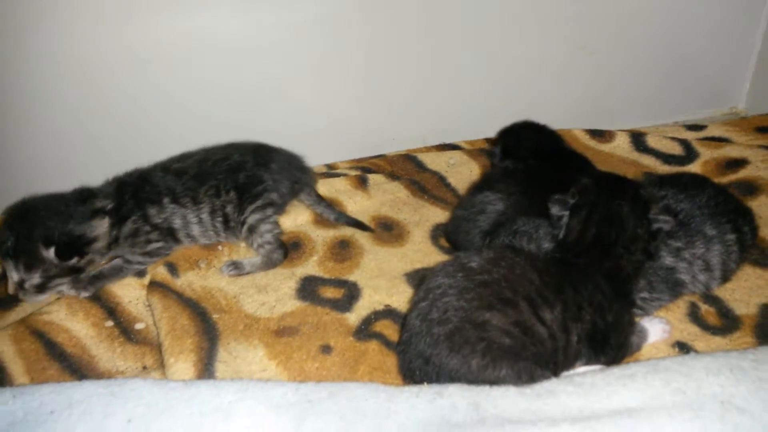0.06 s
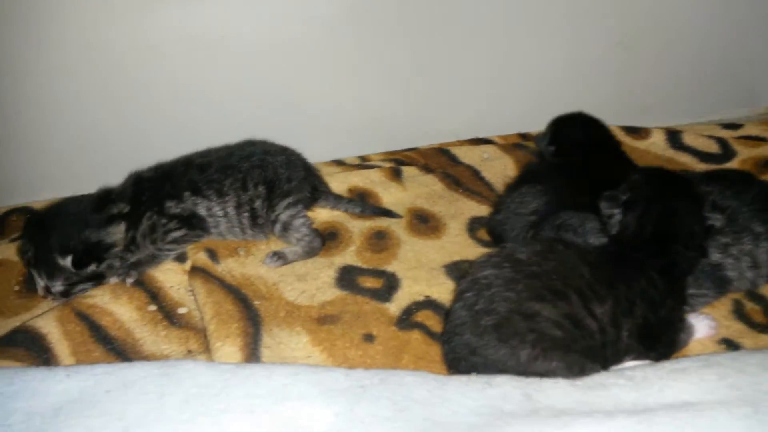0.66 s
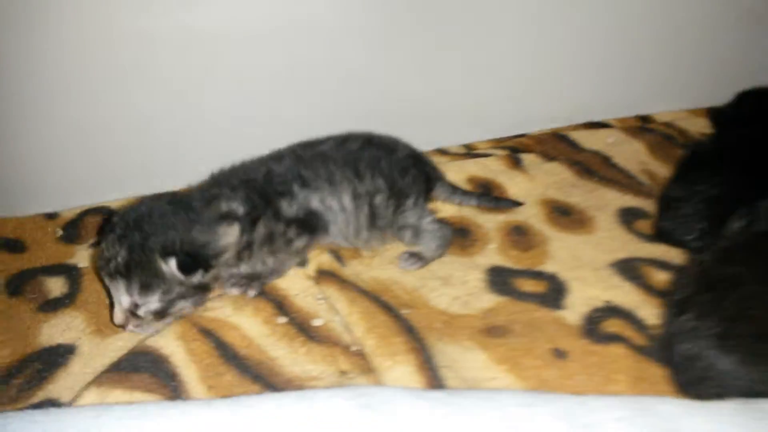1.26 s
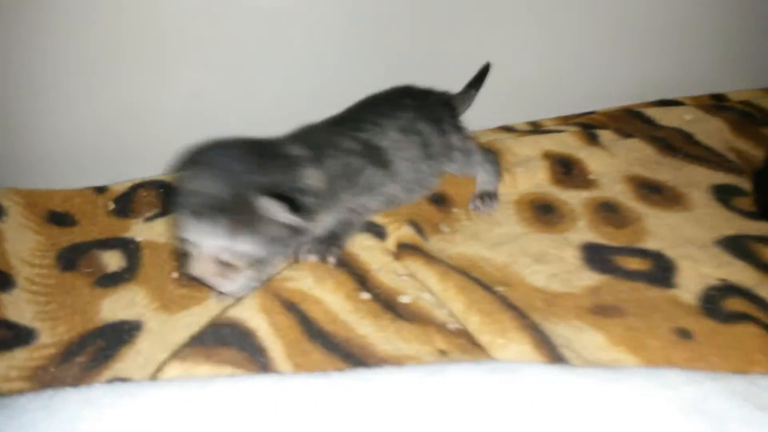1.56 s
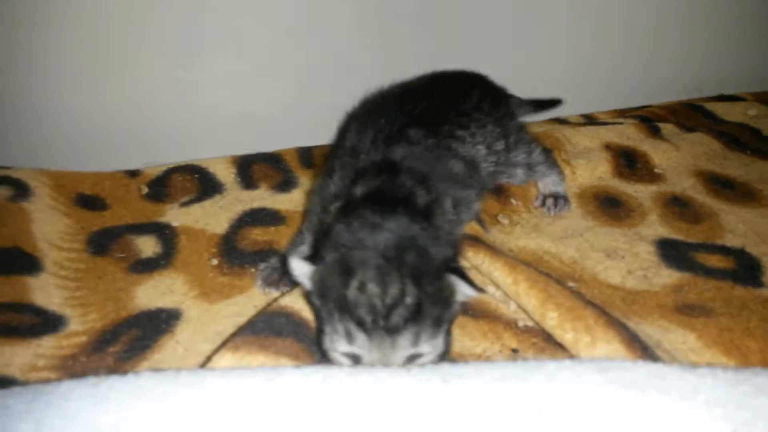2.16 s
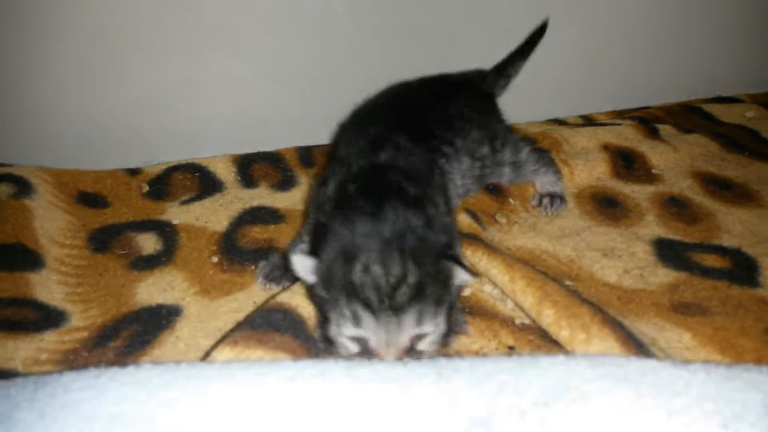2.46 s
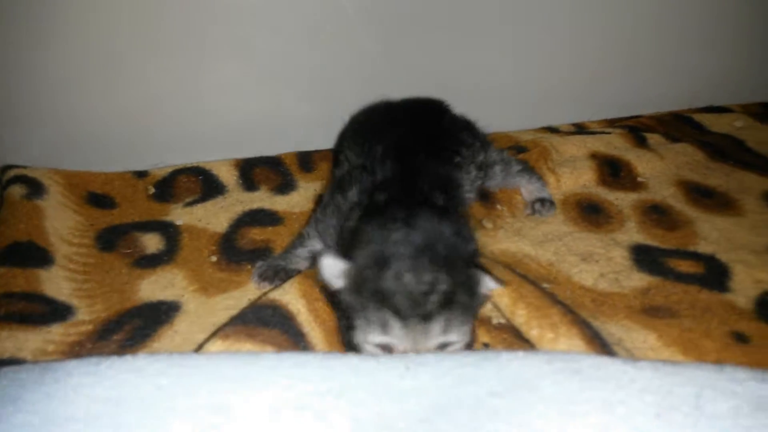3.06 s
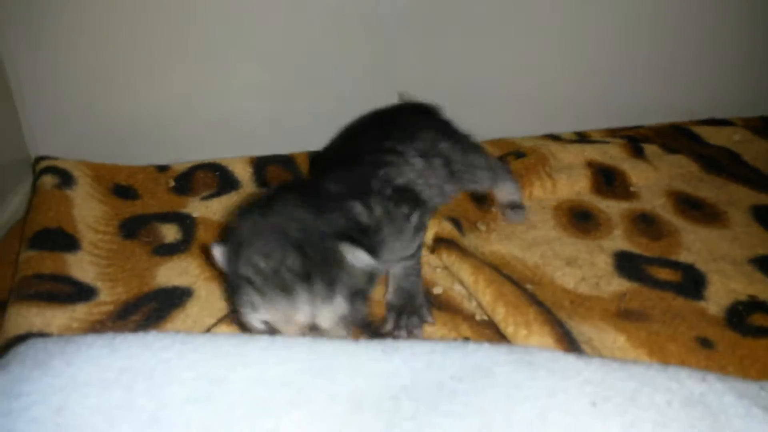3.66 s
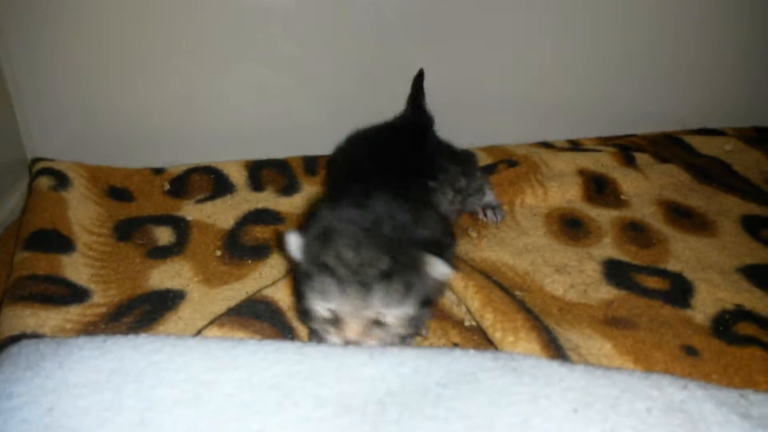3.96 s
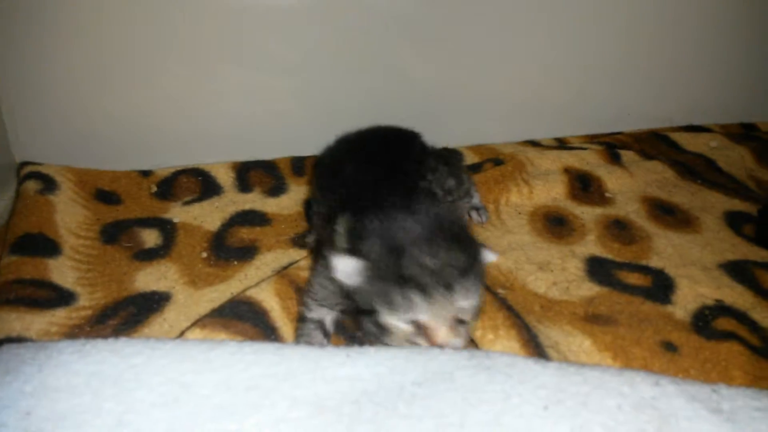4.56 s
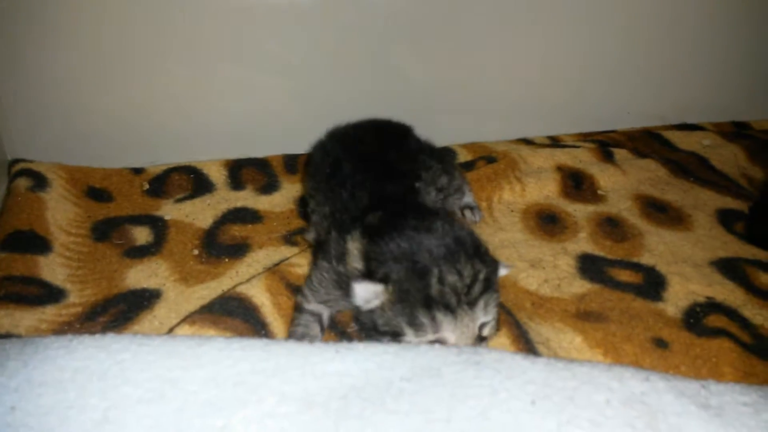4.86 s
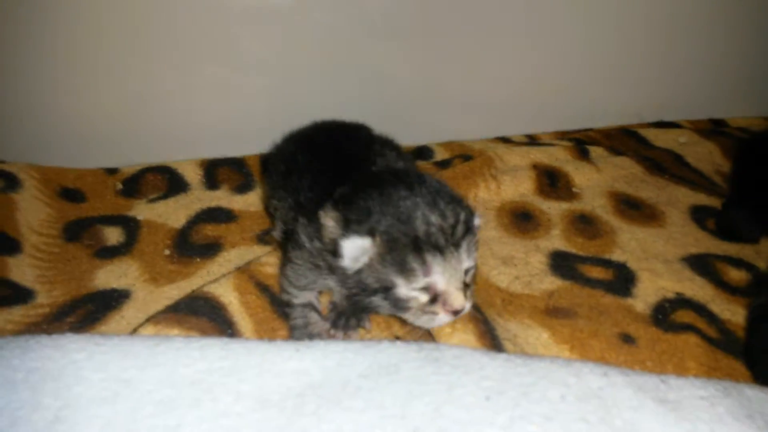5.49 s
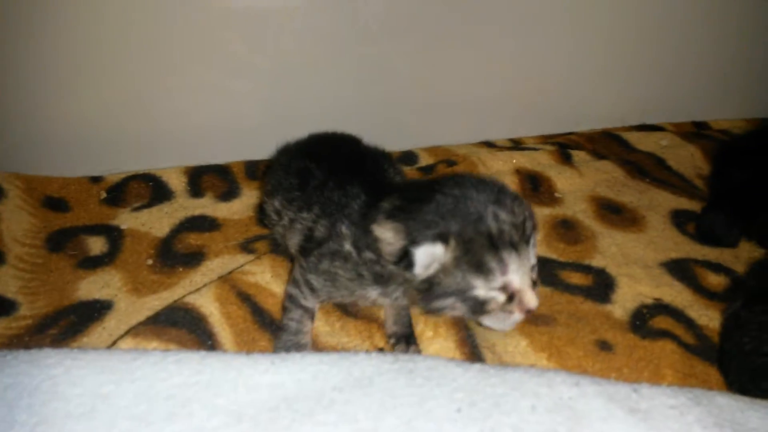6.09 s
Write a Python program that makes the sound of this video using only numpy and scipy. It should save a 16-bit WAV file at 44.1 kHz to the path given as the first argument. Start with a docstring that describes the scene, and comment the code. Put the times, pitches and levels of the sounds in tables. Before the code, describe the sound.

A newborn kitten gives thin, high mews while crawling on a blanket, and halfway through a heavy door bangs shut and latches.

```python
"""Kitten on a blanket

A newborn kitten mews six times in a small room; its vocal folds make each mew a thin arch of pitch. Its breath
rasps as a mew begins; its mouth smacks, its claws tick and its fur brushes the fleece as it crawls. Halfway, a
heavy door rumbles, creaks, bangs and latches, and the room rings after it over a low drone and a faint hiss."""
import sys
import numpy as np
from scipy import signal
from scipy.fft import rfft, irfft, next_fast_len
from scipy.io import wavfile

SR = 44100
rng = np.random.default_rng(int(sys.argv[2]) if len(sys.argv) > 2 else 0)


def wav_record(signal):
    """Record a signal, one row per channel, as 16-bit PCM in the file named by sys.argv[1]."""
    frames = np.transpose(np.atleast_2d(signal))
    bounded = np.clip(frames, -1, 1)
    # unit amplitude maps onto the largest positive 16-bit level
    quanta = np.round(bounded * 32767).astype(np.int16)
    wavfile.write(sys.argv[1], SR, quanta)


N = 279153
TIME = np.arange(N) / SR
CUTOFF_HZ = 14700

# Levels are relative. A "colour" is a noise's strength at each frequency; t60 is the time to fade 60 dB.
# one mew a row: start t/s, catch t/s, top t/s, end t/s, start f/Hz, top f/Hz, end f/Hz, flatness of
# the top, mouth opens t/s, fundamental level/dB, octave level/dB, shrill level/dB, tilt/(dB per octave)
MEWS = [(0.046, 0.196, 0.315, 0.490, 516, 1161, 864, 2.8, 0.23, -47, -56, -49.5, -0.5),
        (1.450, 1.636, 1.695, 1.997, 702, 1420, 838, 1.6, 1.54, -42.5, -44, -40.5, -3),
        (2.510, 2.649, 2.787, 2.893, 464, 1126, 801, 4.7, 2.695, -46, -41, -48.5, 2.5),
        (3.979, 4.105, 4.163, 4.245, 513, 790, 446, 2.6, 4.03, -54.5, -52, -53.5, -1),
        (4.723, 4.854, 4.930, 5.130, 609, 1383, 773, 2.9, 4.770, -46.5, -41, -43.5, -3.5),
        (5.922, 6.062, 6.184, 6.263, 452, 1056, 812, 4.6, 6.17, -50.5, -46, -50, -0.5)]
# wall and bed reflect each mew unevenly: left lead/rad, left minus right/dB (fundamental, then octave)
REFLECTIONS = [(-2.5,1.5,4.5,-8.5),(0.73,0,-1.84,-4),(1,1.5,-2.5,-8),(-0.6,-4,-2,-2.5),(0.6,-6.5,-1.5,1),(0.43,4.5,1.4,-4)]
# the voice breaks and rasps for a moment: t/s, half length/s, depth (0-1)
VOICE_BREAKS = [(0.123,0.021,0.5),(0.26,0.018,0.56),(0.485,0.063,0.48),(1.642,0.017,0.4),(1.798,0.016,0.27),(1.993,0.041,0.53),(2.694,0.0095,0.15),(2.918,0.04,0.7),(4.237,0.044,0.55),(5.007,0.017,0.24),(5.107,0.018,0.38),(6.269,0.0083,0.34)]
# the nearby wall lifts and sinks the two lowest harmonics as they glide: f/Hz, level/dB
WALL_GAIN = [(600,-6),(810,4),(950,-5),(1070,-1),(1170,3.5),(1310,-4),(1420,-0.5),(1650,-1),(1790,-2),(1950,-2),(2080,0),(2270,-3),(2500,-1.5),(2750,1.5)]
# the throat swallows the third harmonic as pitch climbs: pitch f/Hz, level/dB against the octave
THIRD_HARMONIC = [(550,-7.5),(800,-14),(1050,-19),(1250,-19.5),(1400,-41)]
# the tiny mouth shapes the shrill harmonics, from the fourth up: f/Hz, level/dB
MOUTH_GAIN = [(2200,-11),(3200,-3.5),(4300,-16),(5400,-17.5),(6300,-9.5),(7000,-2),(8200,1.5),(9600,-12),(12000,-19.5),(14500,-20)]
SMACKS = [(.517,-65,0.12),(4.356,-54.5,0.19),(5.303,-54.5,0.096),(5.825,-60.5,0.84)]  # wet smacks of the mouth: t/s, level/dB, t60/s
SMACK_COLOUR = [(450,-13),(800,1.5),(1100,2),(1350,8.5),(1650,7),(2200,-12),(4000,-8),(9000,-11.5)]  # their tone: f/Hz, level/dB

CLAW_TICKS = [(0.3324,-32,0.14),(0.558,-48.5,0.12),(0.579,-41,0.057),(.757,-49,0.044),(1.1105,-41.5,0.11),(1.3057,-48,0.065),(1.406,-44,0.2),(1.429,-42.5,0.12),(1.877,-32,0.026),(1.9037,-30.5,0.1),(2.186,-48,0.09),(3.8803,-37,0.26),(5.203,-43,0.047),(5.303,-45.5,0.042),(5.7284,-41.5,0.021),(5.804,-55,0.032)]  # claws catching the cloth: t/s, level/dB, t60/s
BRIGHT_COLOUR = [(500,-42),(2500,-22),(4800,-17),(6800,-10),(8000,-5.5),(9500,-17),(14500,-29)]  # the tone of claws and breath: f/Hz, level/dB
SNAPS = [(1.9034,-27,6780,0.022),(3.5319,-8.5,7440,0.0026)]  # dry snaps very close by: t/s, level/dB, f/Hz, t60/s
SOFT_RASPS = [(0.061,0.034,-60),(0.122,0.023,-60),(0.32,0.014,-71),(1.204,0.061,-66),(1.462,0.045,-60.5),(2.505,0.06,-58),(3.935,0.027,-57.5),(5.927,0.041,-59)]  # soft rasps of breath as mews begin, and fur brushing the fleece: t/s, half length/s, level/dB
SOFT_RASP_COLOUR = [(400,-4.5),(900,-2.5),(1600,-3.5),(2200,-8.5),(3200,-2.5),(4500,-9.5),(6000,-12),(14000,-24.5)]  # its tone: f/Hz, level/dB

DOOR_BLOWS = [(1.612,-56,-62.5,-90),(2.387,-47.5,-61.5,-78),(2.766,-35.5,-58,-79),(3.269,-15.5,-33.5,-18.5),(3.547,-35.5,-26,-41),(3.655,-43,-58,-32.5)]  # knocks of the door: t/s, boom level/dB, slap level/dB, clatter level/dB
DOOR_MODES = [(68.65,-1.5,0.99),(85.4,8.5,0.36),(123.16,0,1),(145.7,-1,0.57),(199.3,-9.5,0.59),(224.2,-12.5,0.39),(293,-12,0.51),(307,-10,0.44),(465,-12.5,0.56),(640,-12,0.35)]  # the notes that door and room ring with: f/Hz, level/dB, t60/s
THUD_COLOUR = [(25,-16),(48,-23),(100,-2),(170,-10),(215,-7),(370,-10),(700,-27),(3000,-65)]  # the noisy part of the boom: f/Hz, level/dB
SLAP_COLOUR = [(150,-2),(330,-10),(510,1.5),(700,-10.5),(950,-12),(1300,-24.5),(2600,-26),(4100,-18),(6000,-21),(12000,-86)]  # slapping wood: f/Hz, level/dB
CLATTER_COLOUR = [(600,-17.5),(1500,-21),(2800,-17.5),(4300,-16.5),(5700,-11),(7200,-2),(8200,-6.5),(9500,-15),(12000,-20.5),(14500,-37)]  # the rattling metal latch: f/Hz, level/dB
ROOM_DECAY = [(100,0.86),(500,0.62),(2000,0.9),(7000,0.64),(14000,0.48)]  # how long the room rings: f/Hz, t60/s
HANDLE_CLACK = (3.173, -38.5, 0.12)  # the handle, just before the bang: t/s, level/dB, t60/s
CLACK_COLOUR = [(500,-4),(1000,-2.5),(2100,1),(3000,2),(4300,1),(6000,-6),(8000,-3),(14000,-44)]  # its tone: f/Hz, level/dB
LATCH_PINGS = [(3.547,-25,3980,0.024),(3.548,-36,4880,0.031),(3.657,-28,4800,0.041)]  # the struck latch rings: t/s, level/dB, f/Hz, t60/s
HINGE_CREAK = [(3.128,509,-72),(3.134,489,-49.5),(3.17,549,-47),(3.2,626,-50),(3.26,586,-48.5),(3.28,590,-64)]  # the path of the creak: t/s, f/Hz, level/dB

RUMBLES = [(1.61,2.1,-54),(2.365,2.767,-51.5),(2.76,3.27,-46.5),(3.6,4.2,-50.5)]  # the moving door stirs the room's low notes: start t/s, end t/s, level/dB
RUMBLE_COLOUR = [(25,-8.5),(52,-19.5),(62,1.5),(69,3),(80,-4),(105,-19),(123,-3.5),(138,-12),(190,-28),(300,-28),(600,-31),(1200,-41),(3000,-42),(9000,-38)]  # their tone: f/Hz, level/dB
DULL_RUMBLES = [(0.0,0.3,-60),(.32,.42,-59.5),(1.6,2.15,-61.5),(3.9,5.7,-61.5),(5.7,6.33,-60)]  # a dull low rumble comes and goes: start t/s, end t/s, level/dB
DULL_RUMBLE_COLOUR = [(25,-5),(49,0),(81,-7),(118,-1.5),(151,-13),(181,-8.5),(230,-24),(550,-26.5),(1200,-31.5),(3000,-34)]  # its tone: f/Hz, level/dB
DRONE_COLOUR = [(20,-10),(40,-9),(70,-10.5),(130,-13),(220,-27.5),(1000,-71)]  # steady low air of the house: f/Hz, level/dB
HISS_COLOUR = [(200,-17),(400,-11.5),(1500,-16),(5000,-17),(6200,-14.5),(7000,-4.5),(8200,-4.5),(9200,-15.5),(14500,-17)]  # faint hiss: f/Hz, level/dB
WHINE_TONES = [(8000,-79),(14000,-95.5)]  # thin electronic tones: f/Hz, level/dB
STEREO_LIKENESS = [(100,1),(300,0.74),(600,0.26),(1200,0.059),(4000,0),(14000,0.088)]  # how alike left and right are: f/Hz, correlation (1 = the same)
STEREO_BALANCE = [(120,0),(280,-3.5),(600,-0.5),(1200,2),(4000,0.5),(6500,7),(8300,-2),(10000,-2),(14000,1)]  # which side is louder: f/Hz, left minus right/dB


def kitten(voice_db=-1, echo_db=-7, echo_t60=0.16):
    """The mews, smeared by quick reflections from the corner, mostly in the treble."""
    voice, t = np.zeros((2, N)), np.arange(SR // 4) / SR
    for row, reflection in zip(MEWS, REFLECTIONS):
        add(voice, *mew(row, reflection))
    echo = noise([(1200, -9), (2500, -3.5), (6000, 1.5), (14000, -7)], len(t))
    echo *= from_db(-60 * t / echo_t60)
    echo /= np.sqrt(np.sum(echo ** 2) / 2)
    reflected = signal.fftconvolve(voice, echo, axes=1)[:, :N]
    return from_db(voice_db) * (voice + from_db(echo_db) * reflected)


def mew(row, reflection, jitter=0.00442, rasp_jitter=0.048, breath_db=-19.5, fade_s=0.012):
    """Vibrating vocal folds make the tone; when the voice rasps, their cycles turn uneven and weaker."""
    t, pitch, fundamental_db, octave_db, shrill_db, tilt_db = mew_shape(row, fade_s)
    size = len(t)
    croak = 0.5 * np.clip(1.5 - pitch / 650, 0, 1)  # the folds are slack at low pitch
    rasp = croak + sum(depth * bump(t, s, width) for s, width, depth in VOICE_BREAKS)
    wobble = drift(70.12, size) + 0.65 * drift(600, size)
    pitch = pitch * (1 + jitter * wobble + rasp_jitter * rasp * drift(900, size))
    phase = 2 * np.pi * np.cumsum(pitch) / SR
    tone = 0
    for k, db, (lead, side_db) in zip((1, 2), (fundamental_db, octave_db), np.reshape(reflection, (2, 2))):
        gain = from_db(db + 2.56 * drift(80.3, size)) * pan(side_db)
        tone += gain * np.sin(k * phase - lead * np.array([[0], [1]]))
    tone += overtones(pitch, phase, octave_db, shrill_db, tilt_db)
    puffs = 1 + np.cos(phase)  # air escapes once a cycle
    breath = from_db(shrill_db + breath_db) * noise(BRIGHT_COLOUR, size) * puffs
    fade = np.clip(np.minimum(t - t[0], t[-1] - t) / fade_s, 0, 1)
    tremble = 1 + (0.041 + 0.57 * rasp) * drift(1000, size)
    return t[0], (np.sqrt(2) * tone + breath) * fade * from_db(-3 * rasp) * tremble


def mew_shape(row, fade_s, opening_s=0.016, fall_power=1.45):
    """Pitch climbs, levels off and falls; higher is louder, and an open mouth is brighter."""
    start, catch, top, end, start_hz, top_hz, end_hz, flatness, opens = row[:9]
    fundamental_db, octave_db, shrill_db, tilt_db = row[9:]
    t = np.arange(start - fade_s / 2, end + fade_s / 2, 1 / SR)
    to_climb = np.maximum((top - t) / (top - start), 0) ** flatness
    fallen = np.maximum((t - top) / (end - top), 0) ** fall_power
    pitch = top_hz - (top_hz - start_hz) * to_climb - (top_hz - end_hz) * fallen
    pitch *= 1 - 0.022 * bump(t, catch, 0.026)  # the voice catches once on the way up
    effort = np.log2(pitch / top_hz)  # in octaves: 0 at the top, negative below
    shut = 1 / (1 + np.exp((t - opens) / opening_s))  # falls from 1 to 0 as the mouth opens
    push_db = 2.5 * bump(t, end - 0.04, 0.034)  # a last push before the voice stops
    fundamental_db += 10.5 * effort - 3.5 * shut + at_hz(WALL_GAIN, pitch) + push_db
    octave_db += 13 * effort - 6.5 * shut + at_hz(WALL_GAIN, 2 * pitch) + push_db
    shrill_db += 20.5 * effort - 9 * shut
    return t, pitch, fundamental_db, octave_db, shrill_db, tilt_db


def overtones(pitch, phase, octave_db, shrill_db, tilt_db, highest=20, flutter_db=3.5):
    """The throat sets the third harmonic; the mouth shares the shrill level among the higher ones."""
    harmonics = np.arange(3, highest + 1)
    shrill_hz = harmonics[1:, None] * pitch
    mouth = from_db(at_hz(MOUTH_GAIN, shrill_hz) + tilt_db * np.log2(shrill_hz))
    mouth *= shrill_hz < CUTOFF_HZ
    shrill_gains = from_db(shrill_db) * mouth / np.linalg.norm(mouth, axis=0)
    third_gain = from_db(octave_db + at_hz(THIRD_HARMONIC, pitch))
    out = 0
    for k, gain in zip(harmonics, [third_gain, *shrill_gains]):
        # short waves meet their reflections differently on each side, so they flutter
        flutter, shift = np.reshape([drift(39.1, len(pitch)) for _ in range(4)], (2, 2, -1))
        out += gain * from_db(flutter_db * flutter) * np.sin(k * phase + 1.54 * shift)
    return out


def mouth_smacks():
    """The wet mouth makes small smacks between mews."""
    return bursts(SMACKS, SMACK_COLOUR)


def crawling(tick_db=-9, grain_db=2.5, tick_rise_s=0.00087, snap_rise_s=0.00023):
    """Claws pluck fibres in short crackles, two snaps sound on the left, and soft rasps of breath and fur swell
    and fade."""
    out, t = np.zeros((2, N)), np.arange(SR // 4) / SR
    for s, db, t60 in CLAW_TICKS:
        crackle = noise(BRIGHT_COLOUR, len(t))
        crackle *= from_db(db + tick_db - 60 * t / t60 + grain_db * drift(786, len(t)))
        add(out, s, crackle * rise(t, tick_rise_s))
    for s, db, hz, t60 in SNAPS:
        add(out, s, pan(19) * rise(t, snap_rise_s) * ping(t, hz, db, t60))
    pressure = sum(from_db(db) * bump(TIME, s, width) for s, width, db in SOFT_RASPS)
    return out + pressure * noise(SOFT_RASP_COLOUR) * from_db(2 * drift(150))


def door(build_s=0.058, thud_db=-11):
    """Each blow sets the panel booming and throws a thud, a slap and a metal clatter into the room."""
    out, t = np.zeros((2, N)), np.arange(SR) / SR
    modes = sum((-1) ** k * ping(t, hz, db, t60) for k, (hz, db, t60) in enumerate(DOOR_MODES))
    crack = rise(t, 0.0012) * (1 + 0.2 * np.exp(-t / 0.00079))
    thud, slap, clatter = (crack * room_ring(c) for c in (THUD_COLOUR, SLAP_COLOUR, CLATTER_COLOUR))
    boom = modes * rise(t, build_s) + from_db(thud_db) * thud  # low notes take time to build
    for s, boom_db, slap_db, clatter_db in DOOR_BLOWS:
        add(out, s, from_db(boom_db) * boom + from_db(slap_db) * slap + from_db(clatter_db) * clatter)
    return out


def room_ring(colour):
    """The room draws out a burst of noise: each frequency band fades at its own pace."""
    t, hz = np.arange(SR) / SR, np.fft.rfftfreq(SR, 1 / SR)
    spectrum, out = rfft(noise(colour, SR)), 0
    centres, t60s = np.transpose(ROOM_DECAY)
    for share, t60 in zip(np.eye(len(centres)), t60s):
        band = irfft(spectrum * at_hz(np.c_[centres, share], hz), SR)
        out += band * from_db(-60 * t / t60)
    return out


def handle_and_latch():
    """The handle clacks, then the struck latch pings."""
    out, t = bursts([HANDLE_CLACK], CLACK_COLOUR), np.arange(SR // 4) / SR
    for s, db, hz, t60 in LATCH_PINGS:
        add(out, s, ping(t, hz, db, t60))
    return out


def hinge(unevenness=0.086, octave_db=-23):
    """The hinge slips unevenly and gives a short, wavering groan."""
    times, freqs, levels = np.transpose(HINGE_CREAK)
    pitch = np.interp(TIME, times, freqs) * (1 + unevenness * drift(250))
    phase = 2 * np.pi * np.cumsum(pitch) / SR
    groan = np.sin(phase) + from_db(octave_db) * np.sin(2 * phase)
    moving = (TIME > times[0]) & (TIME < times[-1])
    return moving * from_db(np.interp(TIME, times, levels)) * groan


def movement(spells, colour, rise_s=0.01, t60=0.57):
    """Something moving makes low noise that starts quickly, holds and then dies away."""
    gain = 0
    for start, end, db in spells:
        onset = np.clip((TIME - start) / rise_s, 0, 1)
        gain += onset * from_db(db - 60 * np.maximum(TIME - end, 0) / t60)
    return gain * noise(colour)


def background(drone_db=-68, hiss_db=-64.5):
    """The air of the house drones under a faint hiss and a thin electronic whine."""
    whine = sum(np.sqrt(2) * from_db(db) * np.sin(2 * np.pi * hz * TIME) for hz, db in WHINE_TONES)
    hiss = from_db(hiss_db + drift(21)) * noise(HISS_COLOUR)
    return from_db(drone_db) * noise(DRONE_COLOUR) + hiss + whine


def bursts(rows, colour, rise_s=0.0016):
    """Brief contacts, each a puff of fading noise."""
    out, t = np.zeros((2, N)), np.arange(SR // 4) / SR
    for s, db, t60 in rows:
        add(out, s, noise(colour, len(t)) * from_db(db - 60 * t / t60) * rise(t, rise_s))
    return out


def noise(colour, size=N):
    """Stereo noise of a given colour, alike on both sides in the bass; its power is 1."""
    padded = next_fast_len(size, True)
    hz = np.fft.rfftfreq(padded, 1 / SR)
    mid, side = rfft(rng.standard_normal((2, padded)))
    alike = at_hz(STEREO_LIKENESS, hz)
    spectrum = np.sqrt(1 + alike) * mid + np.sqrt(1 - alike) * side * [[1], [-1]]
    out = irfft(spectrum * from_db(at_hz(colour, hz)), padded)[:, :size]
    return out / np.sqrt(np.mean(out ** 2) + 1e-20)


def drift(rate, size=N):
    """A random wander, typically 1 away from zero, that turns about rate times a second."""
    knots = rng.standard_normal(size // 8 + 2)
    return np.interp(np.arange(size) * rate / SR, np.arange(len(knots)), knots) * np.sqrt(3 / 2)


def ping(t, hz, db, t60):
    """A pure tone that dies away."""
    return from_db(db - 60 * t / t60) * np.sin(2 * np.pi * hz * t)


def rise(t, rise_s):
    """A smooth climb from 0 towards 1."""
    return 1 - np.exp(-t / rise_s)


def bump(t, s, width):
    """A bell curve of height 1 around the moment s."""
    return np.exp(-((t - s) / width) ** 2)


def at_hz(points, hz):
    """Read a table between its rows, on a log-frequency axis."""
    freqs, values = np.transpose(points)
    return np.interp(np.log(np.maximum(hz, 1)), np.log(freqs), values)


def from_db(db):
    """Turn decibels into a gain."""
    return 10 ** (np.asarray(db) / 20)


def pan(db):
    """Left and right gains that make the left louder by db."""
    return from_db(np.array([[0.5], [-0.5]]) * db)


def add(out, s, sound):
    """Mix a sound in, starting at s seconds."""
    start = int(round(s * SR))
    out[:, start:start + sound.shape[-1]] += sound[..., :N - start]


def scene():
    """The kitten, the door and the quiet room, added together."""
    out = kitten() + mouth_smacks() + crawling()
    out += handle_and_latch() + door() + hinge()
    out += movement(RUMBLES, RUMBLE_COLOUR) + movement(DULL_RUMBLES, DULL_RUMBLE_COLOUR)
    return out + background()


def record(dry):
    """Give left and right a slightly different tone and cut the highest treble."""
    size = next_fast_len(N + SR // 10)
    balance = pan(at_hz(STEREO_BALANCE, np.fft.rfftfreq(size, 1 / SR)))
    coloured = irfft(rfft(dry, size) * balance, size)[:, :N]
    lowpass = signal.ellip(12, 0.1, 80, CUTOFF_HZ, fs=SR, output="sos")
    return signal.sosfilt(lowpass, coloured)


dry = scene()
out = record(dry)
wav_record(out)
```